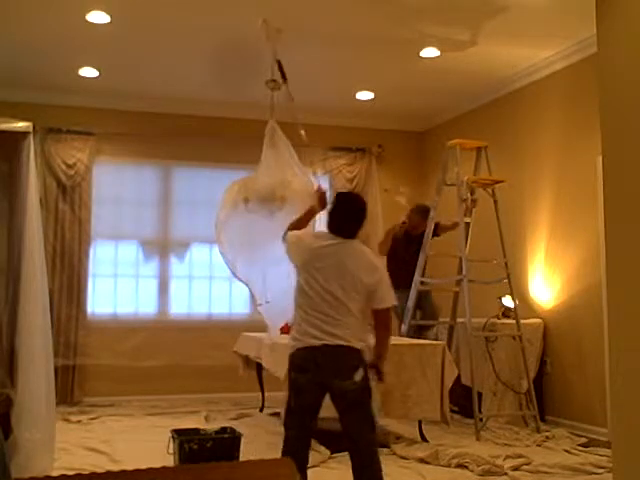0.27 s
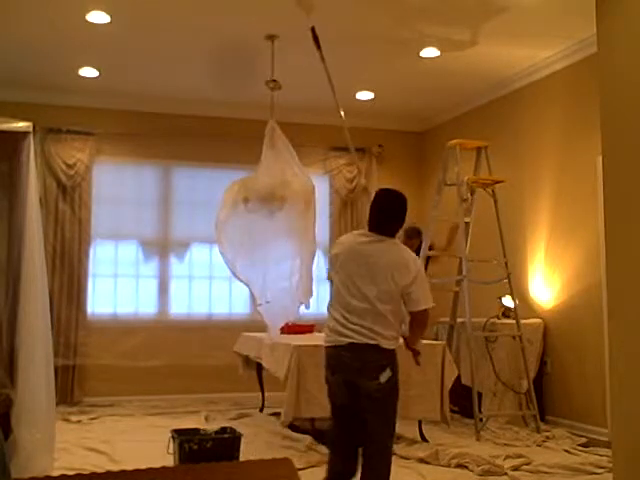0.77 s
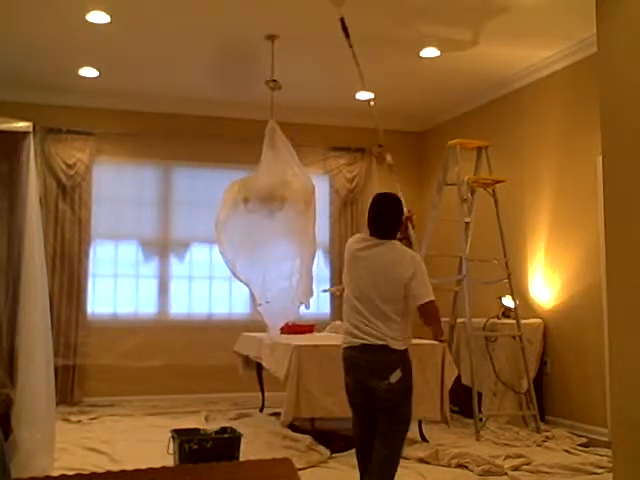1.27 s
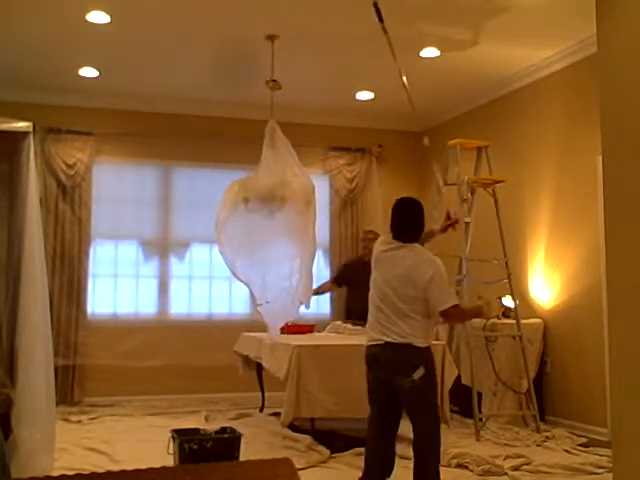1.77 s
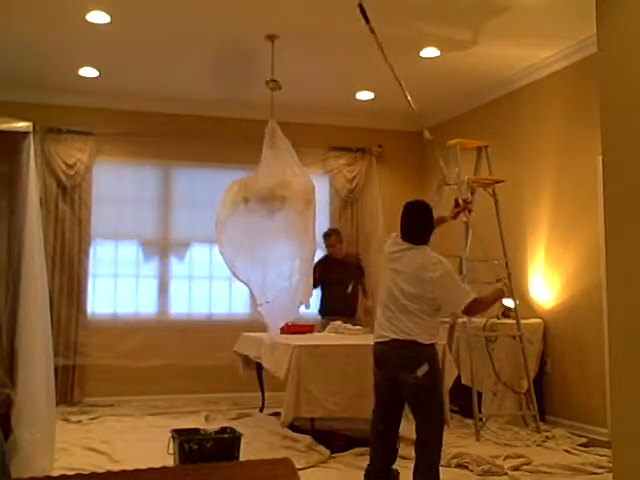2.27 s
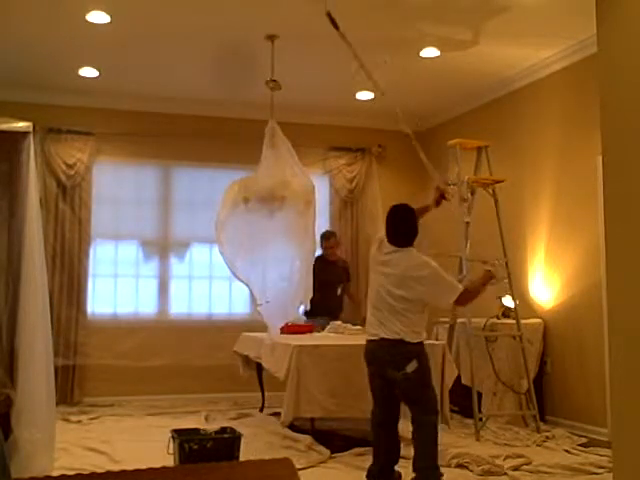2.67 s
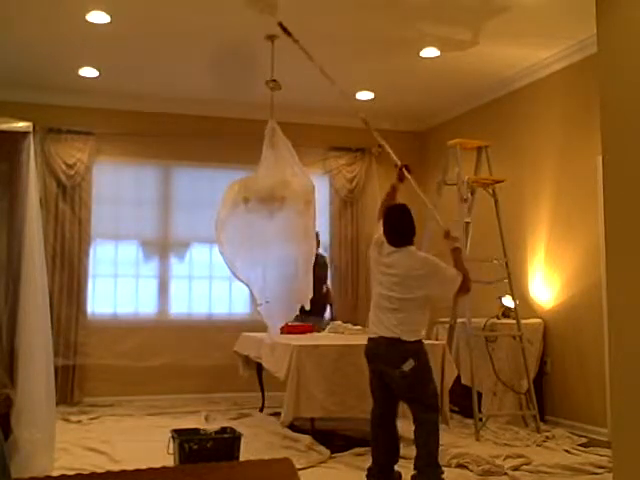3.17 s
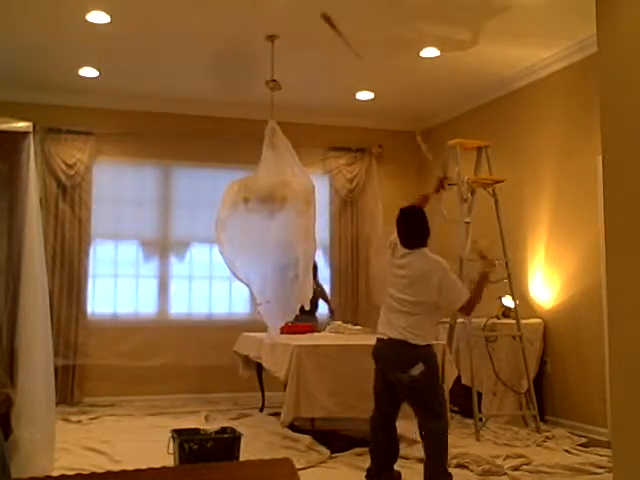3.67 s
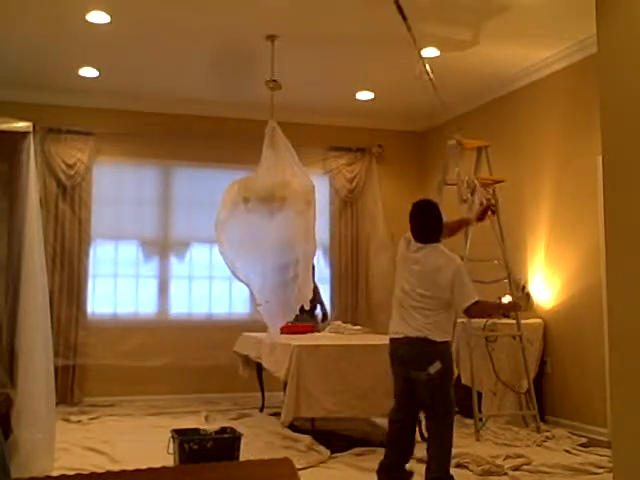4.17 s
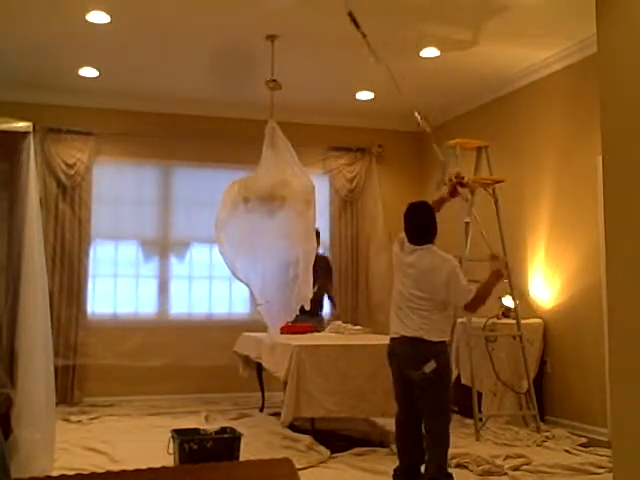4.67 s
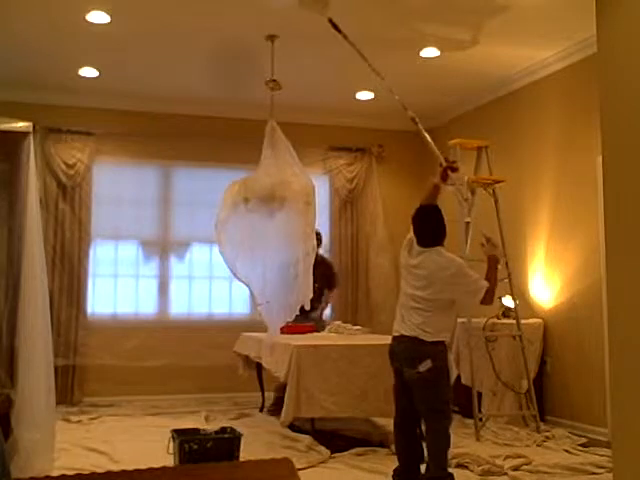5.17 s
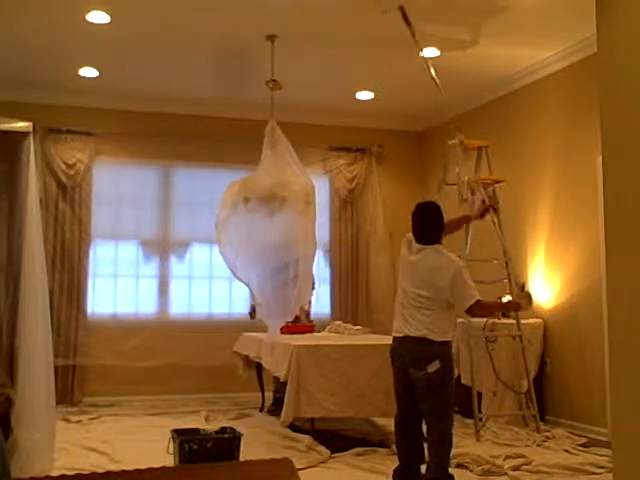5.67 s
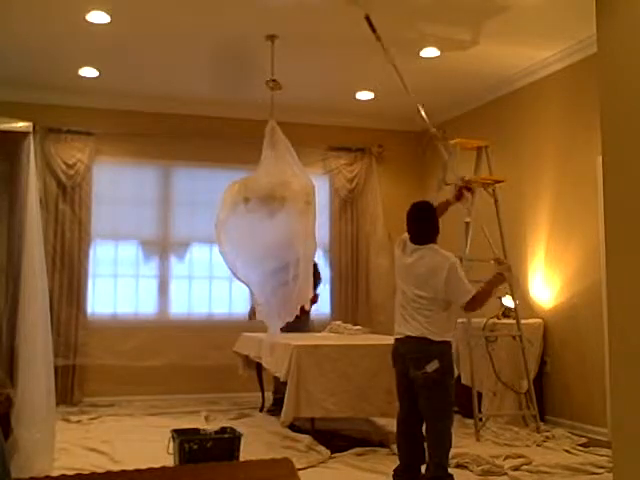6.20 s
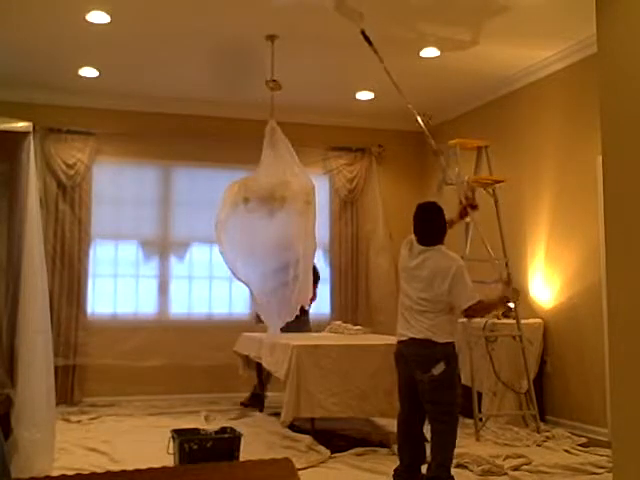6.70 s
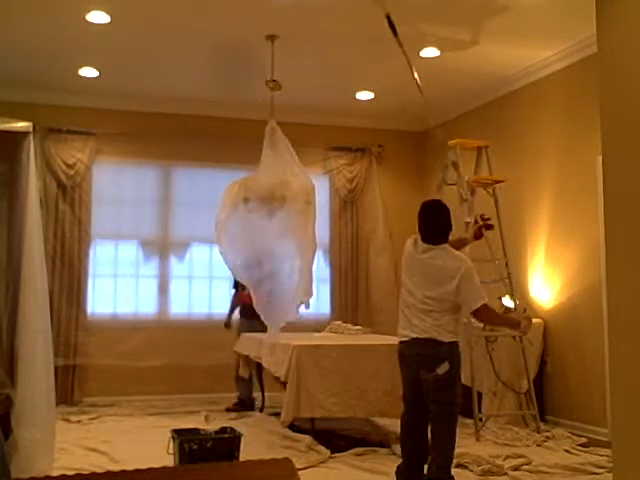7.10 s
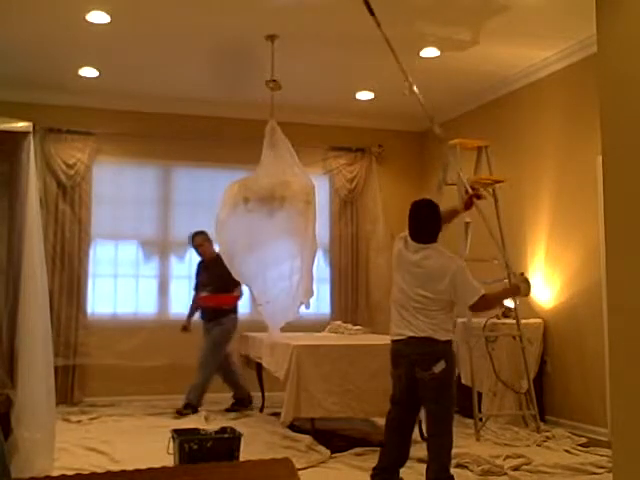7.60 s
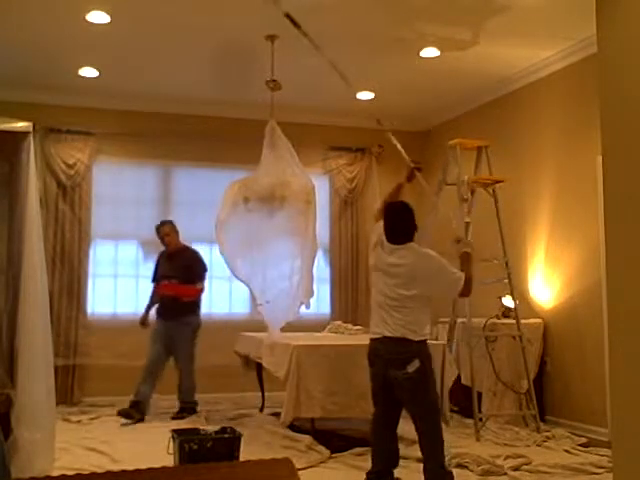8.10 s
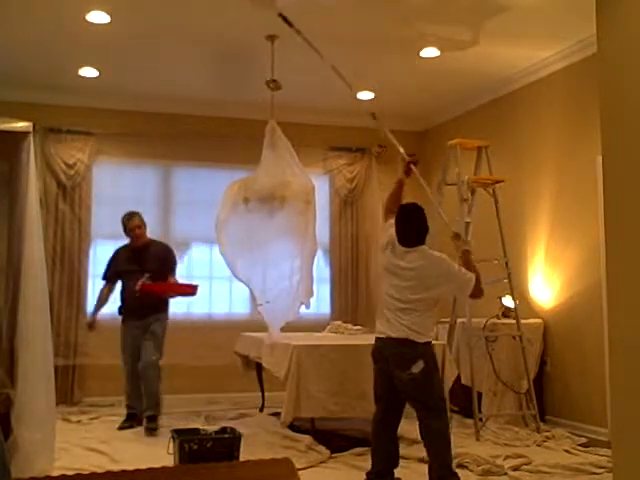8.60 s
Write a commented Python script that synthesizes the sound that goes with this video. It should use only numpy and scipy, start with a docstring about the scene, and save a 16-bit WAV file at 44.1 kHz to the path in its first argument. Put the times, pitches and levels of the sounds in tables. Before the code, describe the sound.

A wet paint roller crackles and hisses across a ceiling, swelling and fading with each stroke, over soft foot scuffs.

```python
"""A sticky hiss full of tiny snaps swells and fades: a wet paint roller on a pole, pushed to and fro
across a ceiling, tears the paint film behind its nap. Down at floor level feet scuff on drop cloths,
something hollow drags and the boards rumble faintly; late on, the pole gives a few soft bumps.
Heard in mono from inside the room, on a camera's small microphone that peaks near 6.6 kHz and carries
the camera's thin electrical whine. Sound under 8 kHz is mirrored weakly above it."""
import sys
import numpy as np
from scipy import signal
from scipy.fft import rfft, irfft, next_fast_len
from scipy.io import wavfile
from scipy.ndimage import map_coordinates

SR = 44100
rng = np.random.default_rng(int(sys.argv[2]) if len(sys.argv) > 2 else 0)


def to_wav(sig):
    """Store sig (one row per channel, or 1-D mono) as 16-bit WAV at the path in sys.argv[1].

    Samples outside -1..1 are clipped; the rate is SR.
    """
    pcm = np.clip(np.atleast_2d(sig), -1, 1) * 32767
    pcm = np.round(pcm).astype(np.int16)
    wavfile.write(sys.argv[1], SR, pcm.T)  # frames by channels


N = 390285

# tearing paint as the small microphone hears it: (frequency [Hz], level [dB])
TEAR_COLOUR = [(1500, -41.5), (3000, -31), (4500, -6.5), (5800, -1), (6600, 3.5), (7200, 0.5), (7700, -6.5),
               (8000, -17.5), (8300, -81.5)]


def roller_motion():
    """Strokes speed up and slow in an arch: gives the power of bright and dull hiss, and stickiness."""
    # (fastest at [s], speeding up [s], slowing [s], level [dB], dull hiss re level [dB], stickiness [0-1])
    strokes = [(.08, 0.058, .14, -56, -11, .05), (.41, 0.28, .09, -51.5, -12, .05),
               (.6, 0.12, 0.42, -53, -9, 0.1), (.97, 0.098, .11, -51.5, -12.5, 0),
               (1.3, .22, 0.3, -60, -9.5, 0), (1.6, 0.16, 0.27, -53, -10, .05),
               (2.1, 0.34, 0.61, -55.5, -11, 0.2), (2.92, .66, 0.45, -48.5, -11.5, 0.45),
               (3.79, .33, .43, -48, -10, .2), (4.62, 0.46, 0.51, -47.5, -10.5, 0.43),
               (5.38, 0.26, 0.25, -50.5, -10, 0.3), (5.68, 0.3, 0.14, -50.5, -9, .3),
               (6.18, 0.44, .44, -49.5, -11.5, 0.42), (7.44, 0.096, .22, -51.5, -11, 0.4),
               (7.92, 0.45, 0.55, -45.5, -9.5, 0.26), (8.55, .17, .2, -55.5, -8.5, .3),
               (8.83, .2, .2, -45.5, -10, 0.3)]
    # short swishes and ticks: cloth or ladder scuffs, and spurts of roller hiss
    # (time [s], peak [dB], rise [s], fall [s], dull hiss re peak [dB])
    swishes = [(.14, -48, 0.041, 0.12, -7.5), (.63, -35, 0.054, 0.12, -9), (.774, -49.5, .03, .04, -13),
               (.81, -51, 0.016, .05, -2), (1.137, -55.5, 0.12, 0.057, -9), (1.65, -44.5, 0.013, 0.041, -9),
               (1.714, -52, 0.016, .1, -10), (1.95, -58.5, 0.055, .06, -12), (2.03, -52, 0.017, .05, -11),
               (2.09, -52.5, 0.034, 0.034, -15), (2.664, -52.5, .03, 0.039, -5),
               (2.92, -45.5, 0.17, 0.15, -10), (3.19, -48.5, 0.28, .1, -10.5), (3.312, -52, .02, .02, -12),
               (3.352, -51.5, .05, 0.17, -6), (3.8, -45.5, 0.31, 0.23, -8.5), (4.07, -50, .25, .2, -9),
               (4.34, -52, 0.13, .2, -11), (4.766, -48, 0.056, 0.11, -10), (5.176, -52, 0.077, 0.054, -18),
               (5.804, -49, .01, 0.084, -16), (5.728, -54.5, .005, 0.013, 1),
               (5.9, -53.5, 0.069, 0.066, -8), (6.178, -45.5, .15, 0.22, -9.5), (6.454, -52, .1, 0.18, -6),
               (7.368, -40.5, .01, 0.016, -10.5), (7.386, -43.5, .01, 0.039, -14),
               (7.574, -47, 0.019, 0.077, -10), (7.702, -43.5, .07, 0.064, -14),
               (7.93, -44.5, 0.12, 0.34, -9), (8.2, -48, .2, .12, -10), (8.012, -48, .005, .015, 0),
               (8.54, -58.5, .005, .015, 1), (8.838, -45, 0.016, .03, -10)]
    t = np.arange(N) / SR
    bright = dull = 1e-12
    for fastest, rise_s, fall_s, db, dull_db, _ in strokes:
        arch = np.interp(t, [fastest - rise_s, fastest, fastest + fall_s], [0, np.pi / 2, np.pi])
        speed = np.sin(arch).clip(0)
        bright += amp(2 * db) * speed ** 2
        dull += amp(2 * (db + dull_db)) * speed ** 1.7
    for *shape, dull_db in swishes:
        swish = swell(*shape)
        bright += swish
        dull += amp(2 * dull_db) * swish
    stickiness = over_time([(row[0], row[-1]) for row in strokes])
    return bright, dull, stickiness


def roller_hiss(bright, dull, stickiness):
    """Paint threads snap behind the nap: the finest merge into hiss, thicker ones tick across the band."""
    # the duller part of the hiss: (frequency [Hz], level [dB])
    dull_colour = [(300, -32), (800, -7), (1500, -4), (2500, 0), (4000, 5), (5500, -9.5), (7500, -30.5),
                   (8300, -76.5)]
    fine = np.sqrt(1 - stickiness) * rng.standard_normal(N)
    fine += np.sqrt(stickiness) * crackle(per_s=900, spread_db=3.5)
    fine *= amp(stickiness * 1.8 * wobble(40))  # sticky film lets go in clumps
    thick = 0.7 * stickiness * crackle(per_s=70, spread_db=-0.5)
    bright_hiss = coloured(np.sqrt(bright) * (fine + thick), TEAR_COLOUR)
    dull_hiss = coloured(np.sqrt(dull) * (fine + 1.59 * thick), dull_colour)
    return bright_hiss + dull_hiss


def paint_snaps(tear_power, stickiness, chances=300):
    """The thickest threads break singly: a click in a short spatter, a treble ring over a broad tick."""
    # (time [s], peak of the ring [dB], tick re ring [dB])
    loud_snaps = [(0.8143, -36, -11), (1.6482, -29.5, -17), (1.7145, -33.5, -13), (1.9265, -39.5, -13),
                  (1.948, -40, -13), (1.9884, -37.5, -11), (2.0247, -30.5, -11), (2.0596, -36.5, -9),
                  (2.0882, -40.5, -11), (2.3351, -37.5, -13), (2.4573, -35, -16), (2.4927, -36.5, -11),
                  (2.5058, -31, -15), (2.5377, -34.5, -11), (2.5741, -33, -13), (2.6125, -32, -12.5),
                  (2.6637, -30, -9), (2.7346, -35, -14), (2.767, -31, -12.5), (2.818, -32, -16),
                  (2.9352, -28.5, -10), (3.0038, -33, -10), (3.0122, -31.5, -10), (3.078, -30, -11),
                  (3.1264, -30.5, -14), (3.1887, -32.5, -11), (3.3108, -38.5, -11), (3.3485, -37, -11),
                  (3.5134, -39.5, -9), (3.5299, -35, -13), (3.8048, -31, -11), (3.8976, -33.5, -14),
                  (3.9165, -32.5, -12), (4.0725, -37, -11), (4.297, -36, -14), (4.3168, -37, -10),
                  (4.4186, -31.5, -8), (4.495, -37, -15), (4.5929, -23.5, -13), (4.699, -30.5, -15),
                  (4.742, -33, -17), (4.7608, -31, -12), (4.7985, -30, -8), (4.821, -32.5, -5),
                  (4.8936, -31, -10), (5.256, -40, -15), (5.2853, -34.5, -14), (5.3413, -35.5, -17),
                  (5.3833, -32, -11), (5.7294, -35, -11), (5.7433, -33.5, -15), (5.803, -35.5, -11),
                  (5.8137, -34, -13), (5.8555, -35.5, -11), (5.879, -34, -12), (5.8896, -34.5, -7),
                  (5.9567, -34.5, -10), (5.9773, -35.5, -12), (6.0648, -31.5, -8), (6.1774, -30.5, -14.5),
                  (6.3041, -38, -11), (6.3653, -33.5, -9), (6.4248, -30.5, -8.5), (6.459, -29.5, -8),
                  (6.4757, -29, -8), (6.5031, -35, -10), (7.3642, -32, -13), (7.3868, -30, -11),
                  (7.4869, -38, -12), (7.5123, -36, -11), (7.5742, -32, -15), (7.5778, -31, -11),
                  (7.656, -34.5, -9), (7.6829, -28, -10), (7.7044, -29.5, -11), (7.78, -33, -12),
                  (7.799, -29.5, -10), (7.8307, -25, -10.5), (7.8497, -25, -11), (7.881, -25.5, -14),
                  (8.2153, -30.5, -8), (8.537, -40, -8), (8.6378, -37.5, -11), (8.6733, -33, -13),
                  (8.7406, -38, -16)]
    # the broad tick: (frequency [Hz], level [dB])
    tick_colour = [(150, -10.5), (500, -0.5), (1500, 1), (3000, 2.5), (4500, -6), (7500, -16.5),
                   (8300, -91)]
    out, t = np.zeros(N + SR), np.arange(1500) / SR
    ring, tick = impulse_response(TEAR_COLOUR)[:600], impulse_response(tick_colour)[:600]
    when, chance, size = rng.random((chances, 3)).T
    at = (when * N).astype(int)
    breaks = chance < stickiness[at]  # stickier paint sheds more small snaps
    small_db = 10 * np.log10(tear_power[at] * breaks + 1e-20) + 8.5 + 5 * (size - .5)
    small_snaps = np.c_[at / SR, small_db, np.full(chances, -7)]
    stretch = 1 - np.exp(-t / 0.0013)  # the thread stretches before it parts
    for start, db, tick_db in [*loud_snaps, *small_snaps]:
        t60 = 0.0056 * np.exp(0.2 * rng.standard_normal())
        spatter = 0.28 * rng.standard_normal(len(t)) * stretch * amp(-60 * t / t60)
        spatter[round(.0008 * SR)] = 1  # the break itself
        click = unit_peak(np.convolve(spatter, ring))
        click += amp(tick_db) * unit_peak(np.convolve(spatter, tick))
        out[round(start * SR):][:len(click)] += amp(db) * click
    return out[:N]


def pole_bumps():
    """The roller lands and the pole flexes: each bump is one push of air between two small rebounds."""
    # (time [s], peak [dB], half-width [s])
    bumps = [(7.385, -34.5, 0.0085), (7.482, -38, 0.013), (7.56, -40, 0.021), (7.632, -44, 0.022)]
    t, out = np.arange(N) / SR, np.zeros(N)
    for centre, db, width in bumps:
        offset = (t - centre) / width
        out += amp(db) * (1 - offset ** 2) * np.exp(-.5 * offset ** 2)
    return out


def footwork(tear_power):
    """Underfoot, drop cloths rustle in lumps; steps thud and shake the floor near hearing's edge."""
    # (time [s], rise and fall each [s], rustle [dB], thud [dB], rumble [dB])
    scuffs = [(0.092, .12, -60.5, -74, -62), (.17, 0.17, -63, -69, -70), (0.638, 0.036, -68, -70, -62),
              (0.947, 0.091, -68.5, -75, -73), (0.907, 0.088, -60.5, -76, -72),
              (0.856, 0.062, -58, -69, -56.5), (1.63, .15, -64.5, -72, -67), (1.852, 0.18, -84, -79, -56),
              (2.07, .2, -80, -74, -53.5), (1.95, .2, -91, -77, -53), (2.73, 0.12, -82, -66, -53.5),
              (3.007, 0.22, -66.5, -65, -55.5), (3.393, .12, -53, -48.5, -49.5),
              (3.802, 0.37, -57.5, -54, -51.5), (4.302, 0.22, -83, -78.5, -58),
              (4.803, 0.38, -68.5, -62.5, -58), (5.33, 0.12, -70, -61, -54),
              (5.55, 0.18, -63.5, -61.5, -53), (5.73, 0.2, -67.5, -58, -54),
              (6.175, 0.37, -69, -61.5, -54.5), (6.43, .15, -66, -71, -62), (6.602, 0.25, -87, -73, -58),
              (6.773, 0.18, -80, -70, -55), (7.373, 0.24, -64.5, -64.5, -49),
              (7.506, .08, -66.5, -58.5, -51), (7.758, 0.29, -65.5, -62, -50),
              (8.035, 0.46, -63.5, -58, -46.5), (8.85, 0.28, -63, -57, -54)]
    # between scuffs: (rustle [dB], thud [dB], rumble [dB])
    rest_db = [-71.5, -69, -61.5]
    # added by the effort of a stroke, relative to the tearing: (rustle [dB], thud [dB], rumble [dB])
    effort_db = [-21, -27, -16.5]
    # colours of cloth, step and floor: (frequency [Hz], level [dB])
    rustle_colour = [(120, -22), (250, 1), (400, 0.5), (650, 0), (950, -7), (1200, -12), (2500, -22),
                     (4000, -51)]
    thud_colour = [(40, -19.5), (80, -2.5), (130, -3.5), (220, -7.5), (400, -22), (900, -46.5)]
    rumble_colour = [(8, -11.5), (20, 6), (40, -1), (65, -5), (100, -19), (200, -47)]
    gains = []
    for layer in range(3):
        scuffing = sum(swell(time, dbs[layer], ramp_s, ramp_s) for time, ramp_s, *dbs in scuffs)
        effort = amp(2 * effort_db[layer]) * tear_power
        gains.append(np.sqrt(amp(2 * rest_db[layer]) + effort + scuffing))
    rustle, thud, rumble = gains
    rustle *= amp(1.1 * wobble(25))
    return rustle * noise(rustle_colour) + thud * noise(thud_colour) + rumble * noise(rumble_colour)


def hollow_drags():
    """Something hollow drags and knocks on the floor, each contact with its own brightness."""
    # (time [s], peak [dB], rise [s], fall [s], brightness [dB per octave])
    drags = [(0.139, -67.5, 0.032, 0.13, 8.5), (3.317, -59.5, .003, 0.031, 4.5),
             (3.349, -60, .005, 0.072, 5.5), (3.38, -54, 0.034, 0.063, 2), (3.42, -55.5, .05, .05, -1.5),
             (3.46, -60, 0.057, 0.046, 0)]
    # resonances of the body: (frequency [Hz], width [Hz], gain [dB])
    modes = [(574, 180, 2.5), (1275, 250, -2.5), (2094, 500, -4), (2420, 300, -16)]
    out = np.zeros(N)
    friction = unit_rms(rng.standard_normal(N) * amp(1.5 * wobble(150)))
    contacts = [(swell(*shape), tilt_db) for *shape, tilt_db in drags]
    for hz, width, mode_db in modes:
        ring = filtered(friction, lambda f: (1j * f * width / (hz * hz - f * f + 1j * f * width)) ** 1.92)
        octaves = np.log2(hz / modes[0][0])
        power = sum((burst - burst.min()) * amp(2 * tilt_db * octaves) for burst, tilt_db in contacts)
        out += amp(mode_db) * np.sqrt(power) * unit_rms(ring)
    return out


def room_reverb(x):
    """The walls answer a moment later, the treble lasting a little longer than the bass."""
    # (frequency [Hz], time to fall 60 dB [s])
    decay_times = [(300, .35), (2000, 0.44), (8000, 0.49)]
    hz, t, spectrum = signal.stft(rng.standard_normal(SR // 2), SR, nperseg=256)
    decay = amp(-60 * t / over_frequency(decay_times, hz)[:, None])
    tail = signal.istft(spectrum * decay, SR, nperseg=256)[1]
    return signal.fftconvolve(np.pad(x, (200, 0)), tail / np.linalg.norm(tail))[:N]


def camera_whine(tone_hz=7626, frame_hz=58.445):
    """Right at the microphone, a high tone restarts every picture frame and spreads into a comb of lines."""
    # microphone colour on the whine: (frequency [Hz], gain [dB])
    mic_colour = [(5500, -4.5), (6700, 7), (7400, 2.5), (7650, -2), (7900, -12.5)]
    line_hz = np.arange(100, 137) * frame_hz
    slip = 2j * np.pi * (tone_hz - line_hz) / frame_hz  # phase gained per frame against each line
    lines = (np.exp(slip) - 1) / slip * amp(-58 + over_frequency(mic_colour, line_hz))
    t = np.arange(N) / SR
    return sum(abs(line) * np.cos(2 * np.pi * hz * t + np.angle(line)) for hz, line in zip(line_hz, lines))


def camera_hiss():
    """The camera's own steady noise floor."""
    # (frequency [Hz], level [dB])
    hiss_colour = [(60, -7.5), (150, -7.5), (400, -15), (1000, -21.5), (3000, -22.5), (5000, -21.5),
                   (6800, -14), (7500, -16.5), (8000, -22.5), (8300, -88)]
    return amp(-63.5) * noise(hiss_colour)


def thin_tone(hz=2859):
    """A faint, slightly unsteady tone, heard while the roller rests."""
    # (time [s], rms level [dB])
    levels = [(6.6, -100), (6.7, -85), (7.3, -85), (7.4, -100)]
    phase = 2 * np.pi * np.cumsum(hz + 6 * wobble(9)) / SR
    return np.sqrt(2) * amp(over_time(levels)) * np.sin(phase)


def amp(db):
    """Gain of a level in dB; amp(2 * db) is its power."""
    return 10 ** (np.asarray(db) / 20)


def unit_rms(x):
    """x at rms 1."""
    return x / np.sqrt(np.mean(x ** 2) + 1e-20)


def unit_peak(x):
    """x at peak 1."""
    return x / np.abs(x).max()


def over_frequency(points, hz):
    """(frequency [Hz], value) points joined on a log axis."""
    freqs, values = np.transpose(points)
    return np.interp(np.log(hz + 1), np.log(freqs + 1), values)


def over_time(points):
    """(time [s], value) points joined into one value per sample."""
    return np.interp(np.arange(N) / SR, *np.transpose(points))


def swell(peak_s, db, rise_s, fall_s):
    """Power of a burst that climbs 20 dB in rise_s and drops 20 dB in fall_s."""
    t = np.arange(N) / SR - peak_s
    below_peak_db = 20 * np.maximum(-t / rise_s, t / fall_s)
    return amp(2 * (db - np.minimum(below_peak_db, 120)))


def wobble(rate):
    """A smooth random curve, rate knots a second."""
    knots = rng.standard_normal(int(N * rate / SR) + 4)
    return map_coordinates(knots, [np.arange(N) * rate / SR])


def crackle(per_s, spread_db):
    """Random impulses of uneven size, rms 1."""
    chance, size, sign = rng.random(N), rng.exponential(size=N), rng.choice([-1, 1], N)
    return unit_rms((chance < per_s / SR) * sign * amp(spread_db * np.minimum(size, 4)))


def filtered(x, response):
    """x times a complex response of frequency."""
    size = next_fast_len(N + SR // 2)
    return irfft(rfft(x, size) * response(np.fft.rfftfreq(size, 1 / SR)), size)[..., :N]


def impulse_response(colour, size=8192):
    """The minimum-phase pulse of a colour, energy 1."""
    gain = amp(over_frequency(colour, np.fft.rfftfreq(size, 1 / SR)))
    cepstrum = irfft(np.log(gain), size)
    cepstrum[1:size // 2] *= 2
    cepstrum[size // 2 + 1:] = 0
    pulse = irfft(np.exp(rfft(cepstrum)), size)[:size // 2]
    return pulse / np.linalg.norm(pulse)


def coloured(x, colour):
    """x through a causal filter of that colour."""
    return signal.fftconvolve(x, impulse_response(colour))[:N]


def noise(colour):
    """Coloured noise of rms 1."""
    return coloured(rng.standard_normal(N), colour)


def scene():
    """Roller overhead and feet below, over the camera's hiss and whine; only the snaps get reverb."""
    bright, dull, stickiness = roller_motion()
    snaps = paint_snaps(bright, stickiness)
    roller = roller_hiss(bright, dull, stickiness) + snaps + amp(-11) * room_reverb(snaps)
    movements = footwork(bright) + hollow_drags() + pole_bumps()
    return (roller + movements + camera_hiss() + camera_whine() + thin_tone())[None]


def record(dry):
    """A low sampling rate leaves a fading mirror image above half of it; then the band limit."""
    mirror_hz, top_hz = 8000, 9098
    fade = [(8000, 2.0), (8400, -12), (8800, -27), (9100, -42)]  # (frequency [Hz], gain [dB])
    below = filtered(dry, lambda hz: hz < mirror_hz)
    image = 2 * below * np.cos(2 * np.pi * 2 * mirror_hz * np.arange(N) / SR)
    above = filtered(image, lambda hz: (hz > mirror_hz) * amp(over_frequency(fade, hz)))
    return filtered(below + above, lambda hz: hz < top_hz)


dry = scene()
out = record(dry)
to_wav(out)
```